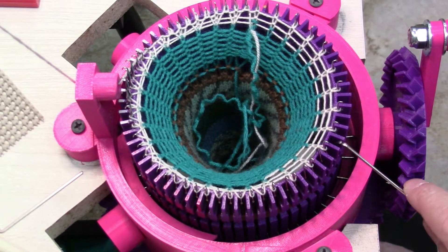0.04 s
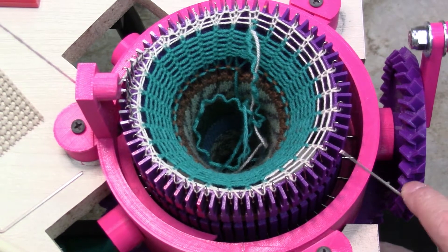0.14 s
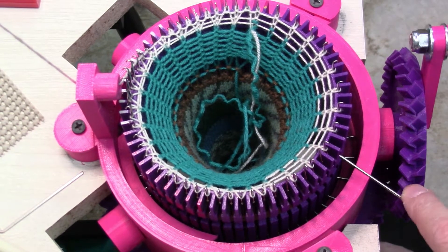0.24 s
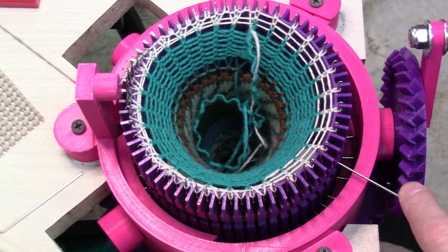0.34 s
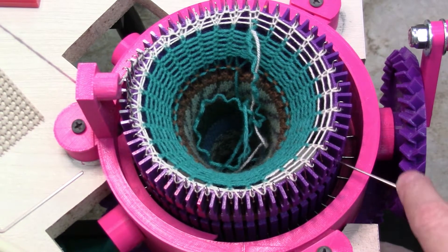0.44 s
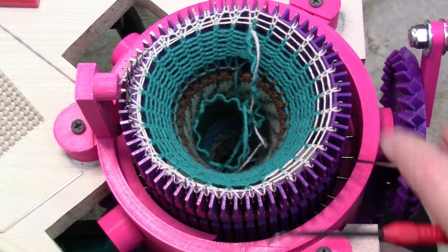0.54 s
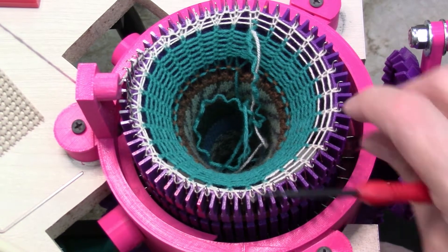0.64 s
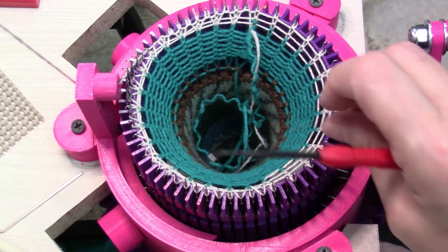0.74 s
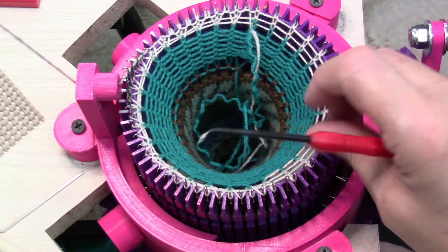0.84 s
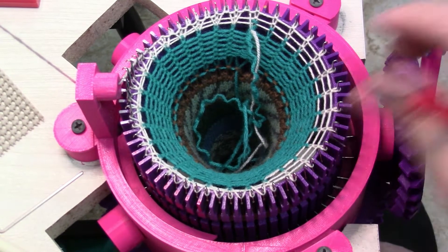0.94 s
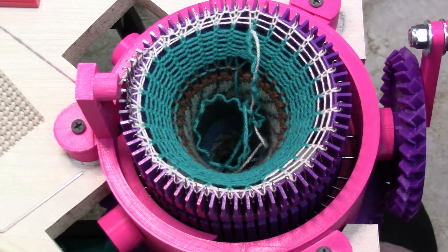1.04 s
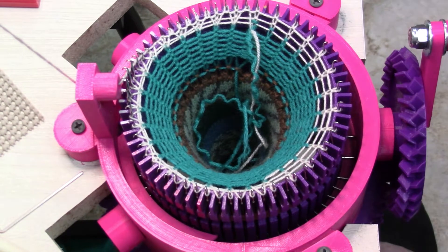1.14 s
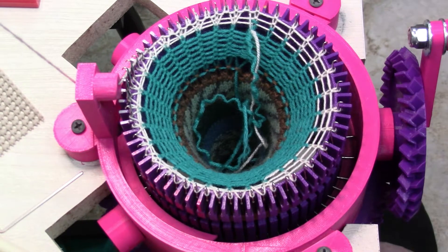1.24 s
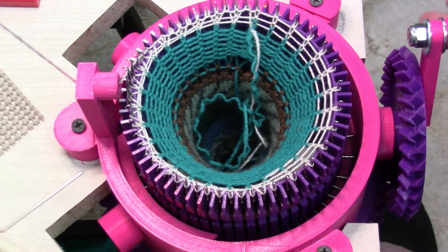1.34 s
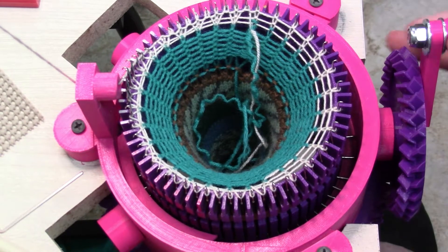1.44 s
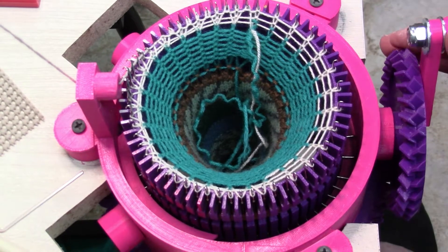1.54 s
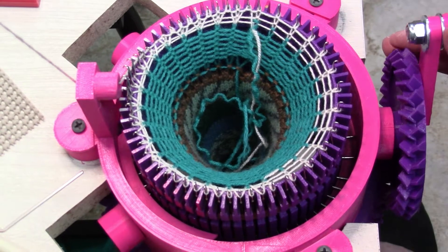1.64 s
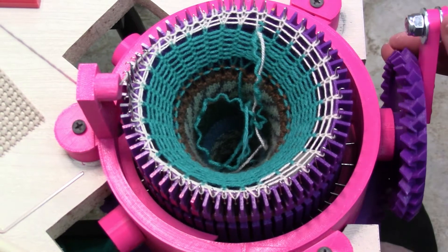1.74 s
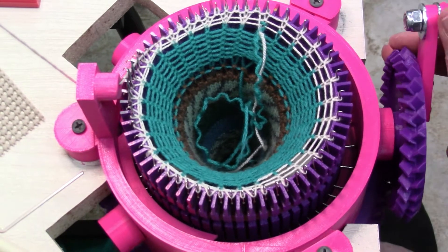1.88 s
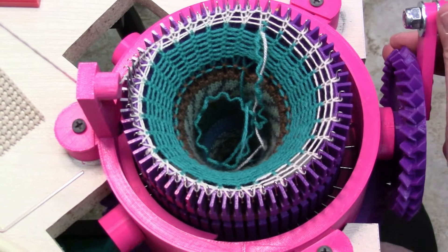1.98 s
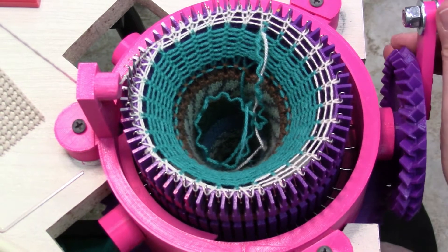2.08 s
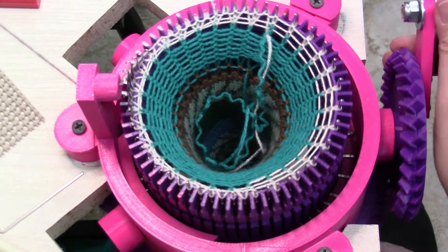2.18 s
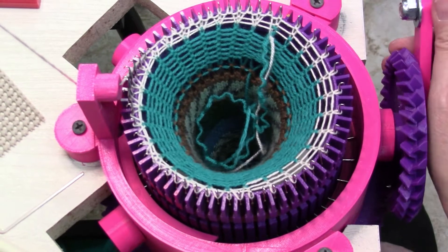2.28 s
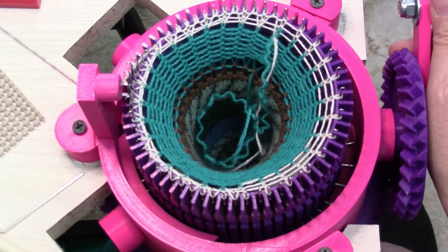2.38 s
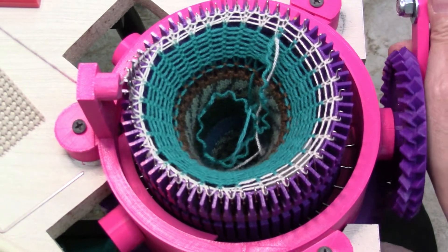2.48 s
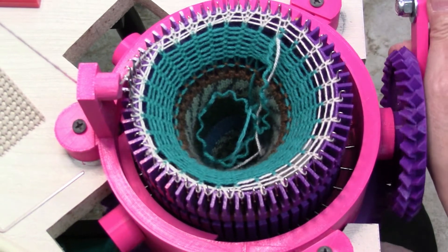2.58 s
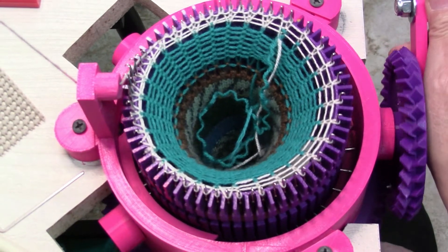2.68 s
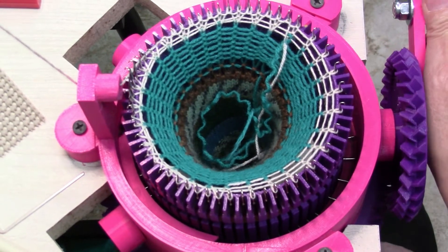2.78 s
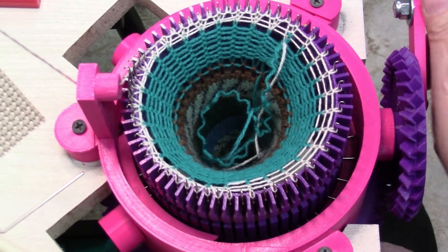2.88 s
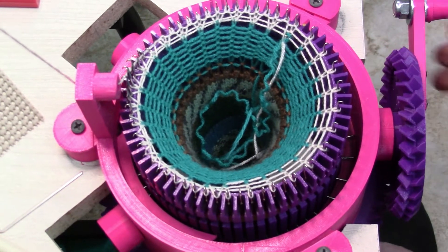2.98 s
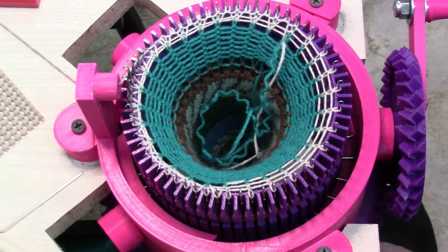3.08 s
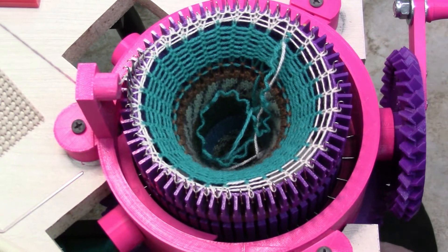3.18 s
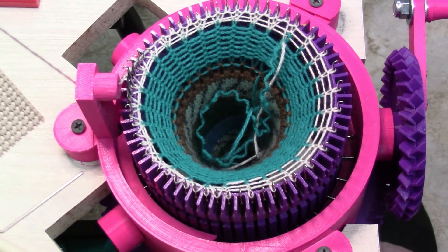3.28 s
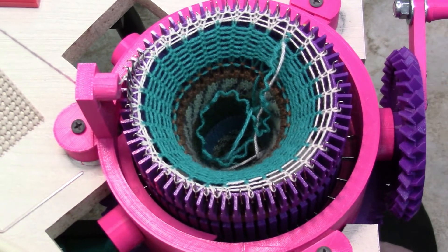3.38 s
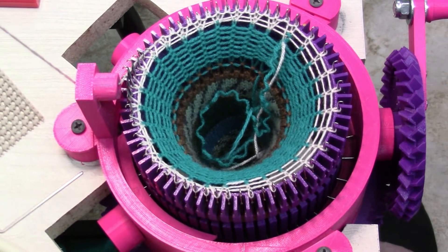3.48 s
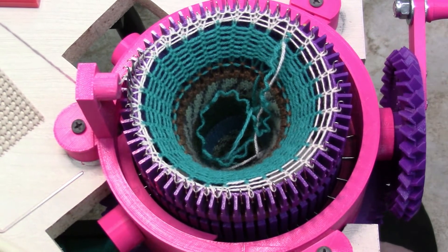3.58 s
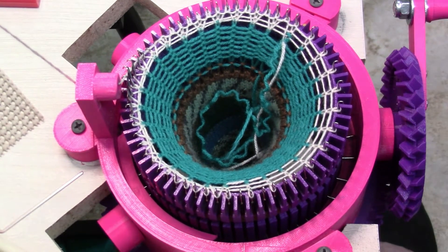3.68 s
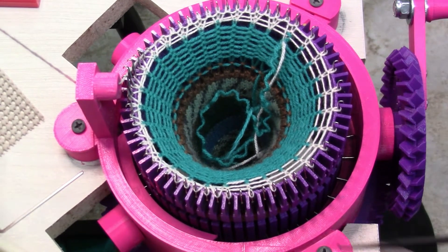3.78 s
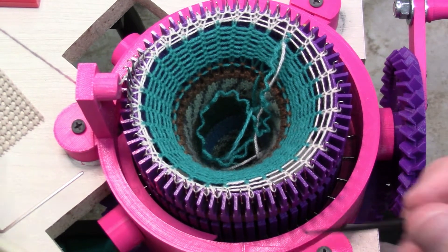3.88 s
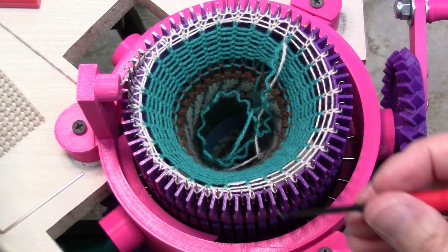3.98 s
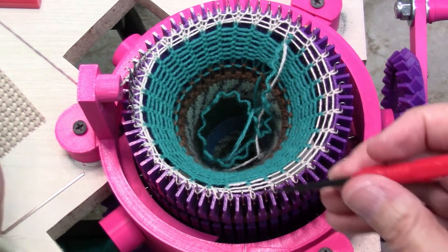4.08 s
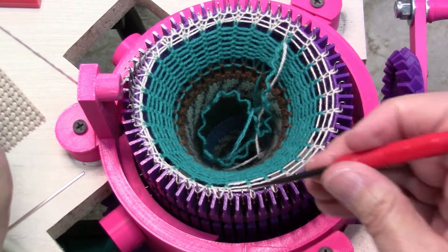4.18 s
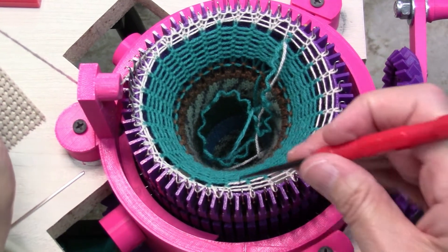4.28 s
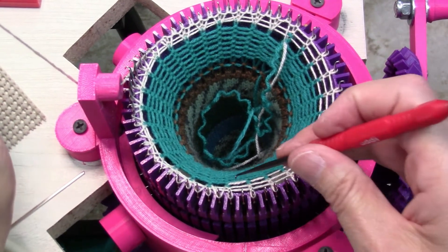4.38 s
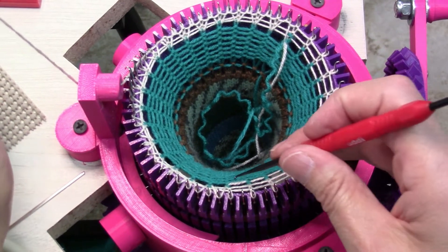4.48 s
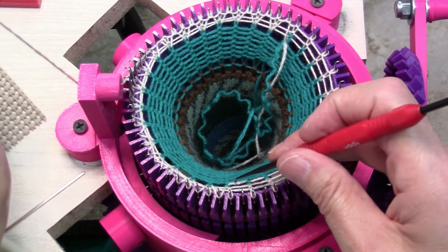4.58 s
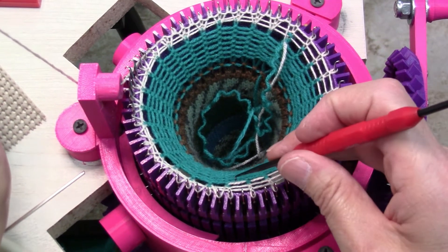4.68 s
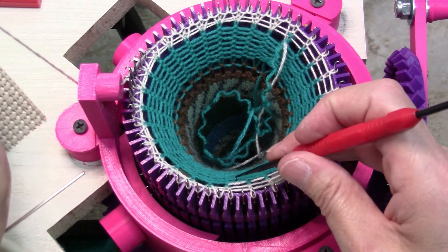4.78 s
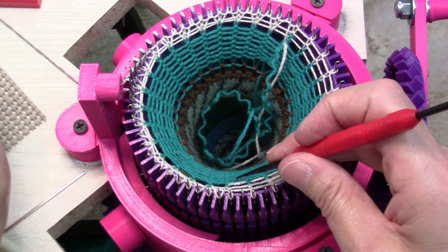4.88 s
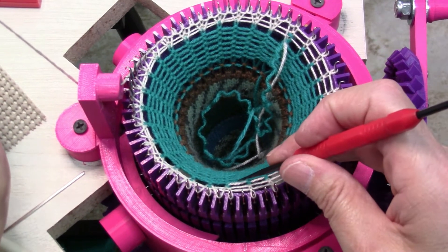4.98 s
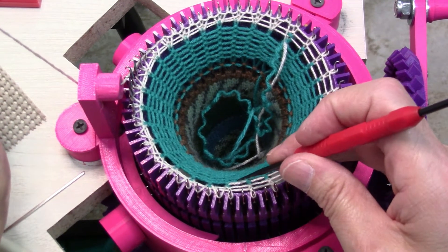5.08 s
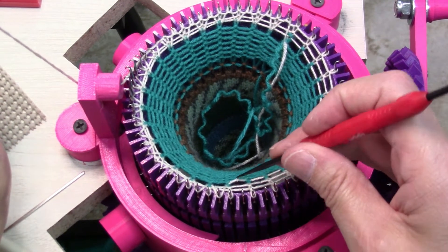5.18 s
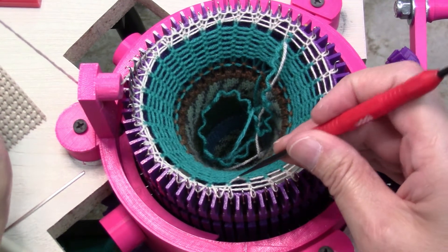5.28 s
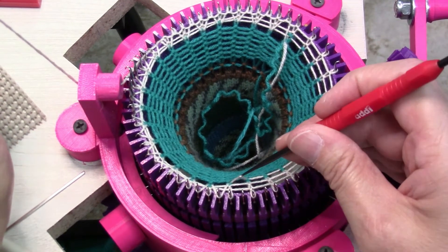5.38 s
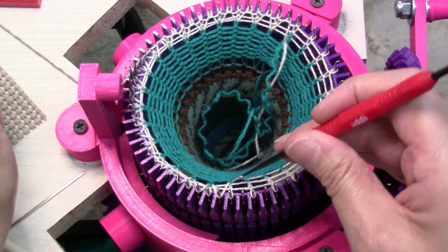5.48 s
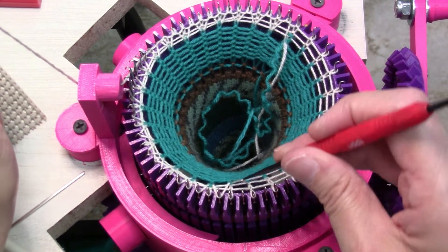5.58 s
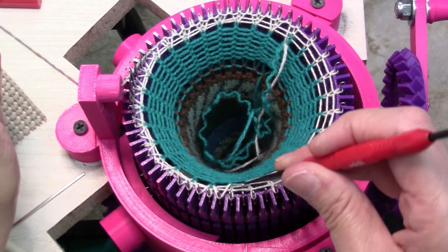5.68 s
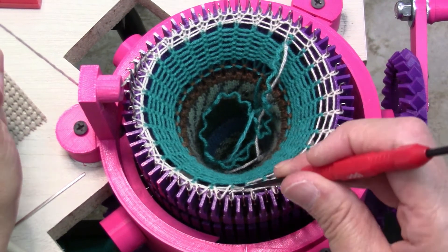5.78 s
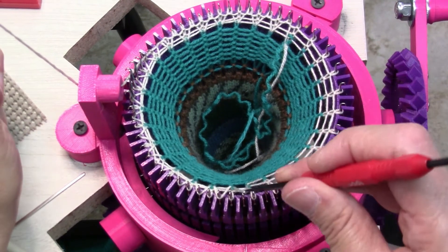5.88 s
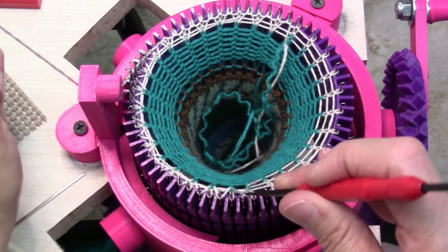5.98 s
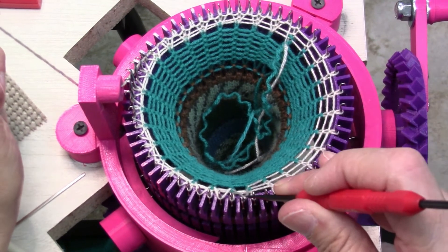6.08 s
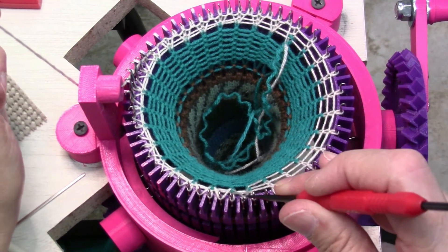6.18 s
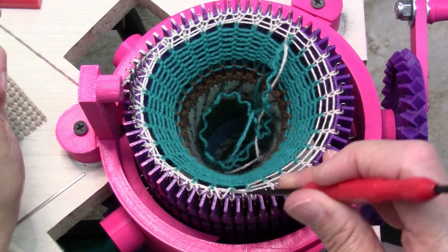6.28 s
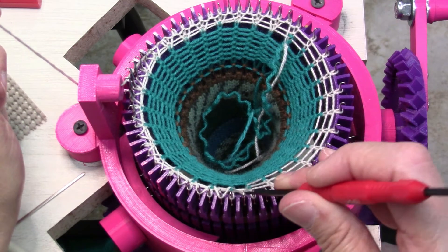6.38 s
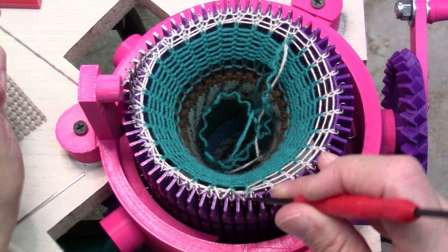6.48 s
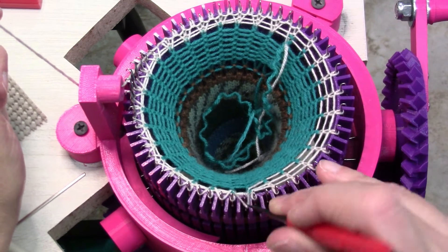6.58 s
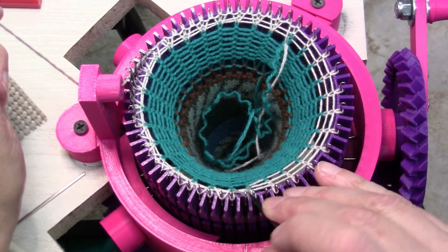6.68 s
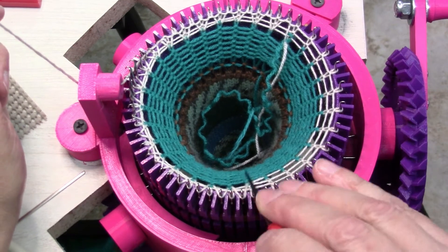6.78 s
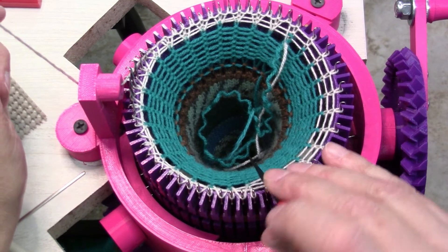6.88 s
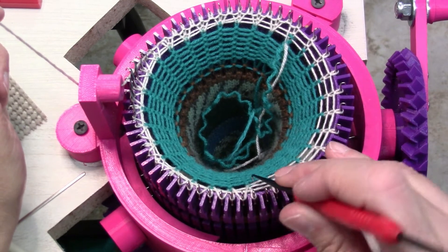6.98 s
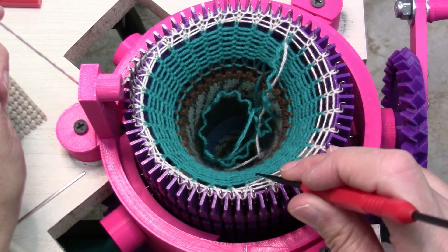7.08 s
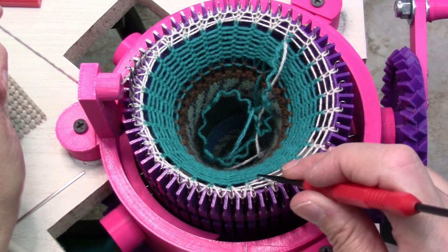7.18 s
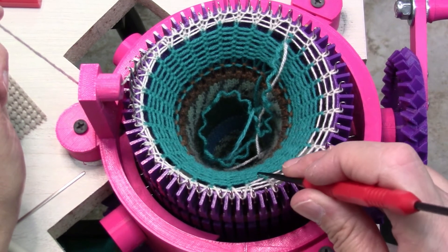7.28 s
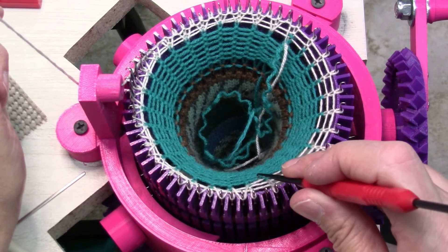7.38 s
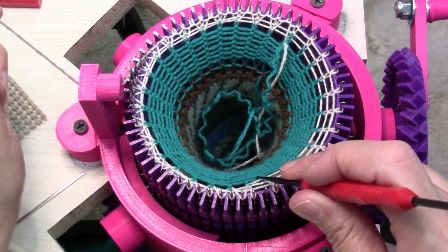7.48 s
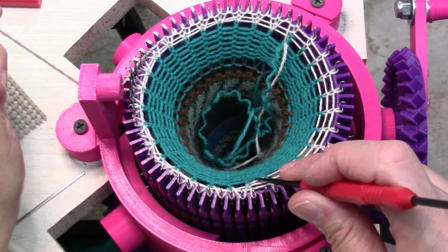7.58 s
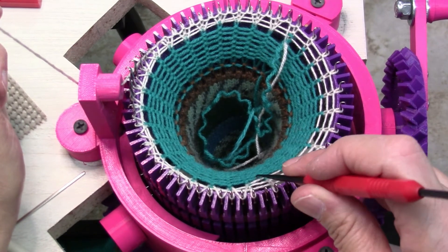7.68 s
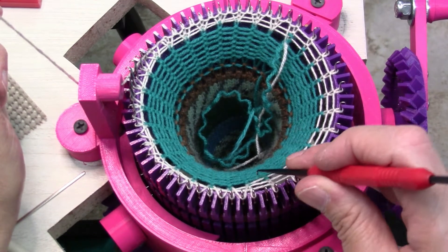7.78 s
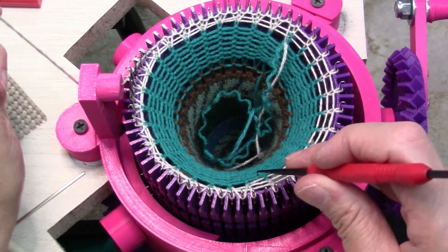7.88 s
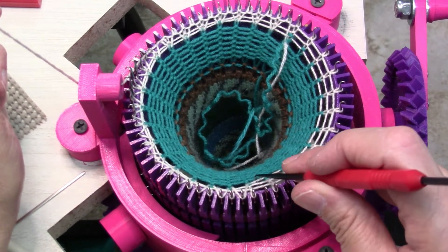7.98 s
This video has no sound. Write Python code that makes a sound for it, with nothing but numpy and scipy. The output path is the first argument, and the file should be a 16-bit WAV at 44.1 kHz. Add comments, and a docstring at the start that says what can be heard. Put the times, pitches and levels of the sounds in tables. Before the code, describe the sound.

A tool clacks down, then three quick rattles of plastic gears and needles, followed by soft hand taps over a low room hush.

```python
"""Hand-cranked knitting machine

A plastic knitting machine works on a table, heard close up in a quiet room.
Each nudge of the crank makes needles snap over the cam in a quick clatter: bursts of force ring the parts.
A hook and fingers tick (lighter bursts) and rub (noise grains) on the cylinder.
The room answers with short noise tails, over a hush of coloured noise, narrow tones and a faint hum."""
import sys
import numpy as np
from scipy import signal
from scipy.fft import rfft, irfft, next_fast_len
from scipy.io import wavfile

SR = 44100
rng = np.random.default_rng(int(sys.argv[2]) if len(sys.argv) > 2 else 0)


def dump_mix(stems):
    """Bounce the given channels to the path in sys.argv[1] as a 16-bit WAV at rate SR."""
    frames = np.atleast_2d(stems).T  # one column per channel
    limited = np.clip(frames, -1, 1)  # hard clip at full scale
    pcm = np.round(limited * 32767).astype(np.int16)
    wavfile.write(sys.argv[1], SR, pcm)


N = 354563  # length [samples]

# Needles snapping over the cam as the crank is nudged; the last two levels are relative to the blow:
# (time [s], blow [dB], needles [dB], frame [dB])
NEEDLE_SNAPS = [(1.6898, -44, -11, -24), (1.72, -40, -13, -8), (1.7329, -12.5, 1.5, -21),
                (1.7693, -11, 2.5, -23.5), (1.7726, -17.5, 0, -21), (1.7795, -19, -1.5, -23),
                (1.7832, -16, -2.5, -14), (1.8221, -15, 0, -25), (1.8315, -22, -4, -25),
                (1.9854, -37.5, -13.5, -25), (2.1499, -38.5, -9, -27), (2.1706, -17, -4.5, -17.5),
                (2.1862, -7.5, -3.5, -21.5), (2.1906, -16.5, -12, -26), (2.2022, -6.5, -2.5, -25),
                (2.2046, -11, 0.5, -30), (2.2168, -13, -6, -17), (2.2286, -13, 1, -32),
                (2.2368, -14, -5, -24), (2.2451, -17, -6, -24), (2.3772, -24.5, 0.5, -25),
                (2.3809, -10, -1.5, -24), (2.385, -12.5, -12, -28), (2.4091, -7, -4, -27),
                (2.4153, -11, -3.5, -24), (2.4476, -13, 1.5, -26), (2.4627, -24, -4.5, -14),
                (2.5146, -24.5, -10, -25), (2.5262, -34.5, -12.5, -16), (2.5559, -32, -12, -20),
                (2.6872, -45, -15, -8), (2.7167, -19, -4, -14.5), (2.7372, -10, -1, -24),
                (2.742, -16.5, -13, -18), (2.7522, -7, -2.5, -28), (2.7643, -13.5, -7, -17),
                (2.7732, -11.5, -2, -19), (2.7795, -13, -2, -20), (2.7902, -16, -8, -22)]
# Hook and fingers tapping the machine, the hook dropped at 0.97 s; last three relative to the blow:
# (time [s], blow [dB], needles [dB], ring gear [dB], frame [dB])
HAND_TAPS = [(0.041, -47, -29, -5, -20), (0.0614, -49, -35, 0, -20), (.1005, -48, 4, 2, -1),
             (0.142, -39.5, -16, -6, -9), (0.1803, -41, -11, -23, -15), (.1942, -34, -9, -17, -10),
             (0.2047, -34, -13, -10.5, -15), (.3016, -53, -14, -6, -22), (.342, -32, -27, -9, 1),
             (.3712, -21, -3, -16, -28), (0.5388, -44.5, -10, -31, -15), (.549, -39.5, -7, -11, -22),
             (0.6619, -41, -12, -7, -26), (.7085, -45.5, -3, -9, -11), (.7737, -47, -6, -3, -26),
             (.796, -38.5, -9, -7, -24), (0.8118, -42, -18, -13, -23), (0.836, -34.5, -10.5, -18, -34),
             (.8458, -41, -8, 0, -20), (.879, -40.5, -3, -3, -15), (0.8984, -31.5, -11.5, -2, -17),
             (0.9719, -8.5, -2, -10, -29.5), (0.9774, -10, -8, -17, -34), (0.9849, -13.5, -5.5, -8, -35),
             (0.9956, -19, 2, -23, -31), (1.004, -18, -3, -20, -26), (1.0125, -25, 1, -17, -35),
             (1.0262, -26, -5, -15, -21), (1.0459, -26, -3.5, -7, -23), (1.3547, -36.5, -15, -5, -7.5),
             (1.513, -35.5, -18, -5, -14.5), (3.1985, -49, 10.5, -22, -9), (3.4744, -46.5, -9, 6, -11),
             (5.2533, -32, -12.5, -9.5, -22), (5.4053, -35, -9, -8, -35), (5.42, -41, -12, -6.5, -26),
             (5.43, -33.5, -15.5, -19, -34), (5.4375, -39.5, -16, -9.5, -23), (5.666, -61, 8, -13, -14),
             (5.974, -28.5, -22.5, -15, -24.5), (6.017, -49.5, -20, -11, -15),
             (6.0397, -34.5, -11, -12, -15), (6.319, -49, 2.5, -5.5, -18), (6.3554, -38, -9, -18, -25),
             (6.3644, -45, -7, -4, -12.5), (6.4756, -35, -8.5, -10.5, -15.5),
             (6.7023, -36.5, -17, -14, -21), (6.7148, -36.5, 1, -16, -25), (6.7254, -31.5, -7.5, -14, -37),
             (6.763, -39.5, 0, -13, -29), (6.7877, -42.5, -13, 7, -11), (6.7902, -26.5, -13.5, -11.5, -7.5),
             (7.2693, -53, -18, -12, -14), (7.3553, -52.5, -5, -22, -15), (7.5332, -49.5, -23, -4, -18.5),
             (7.548, -43, -7, -7, -11), (7.62, -53, -17, -11, -15), (7.696, -41, -12, -13.5, -19),
             (7.768, -51, -4, -9, -10), (7.7945, -45.5, -12, -8.5, -19)]
# Strokes of hands, yarn and hook: three shaping times, not always in order, then levels,
# the last three relative to the scrape:
# (first time [s], second time [s], third time [s], scrape [dB], squeak [dB], needles [dB], frame [dB])
HAND_STROKES = [(0, 0.073, 0.082, -52, -9, -23, -9), (.09, 0.18, 0.24, -44, -8.5, -9, -7.5),
                (0.28, 0.371, .375, -38.5, -7, -13.5, -3.5), (0.578, .672, .75, -51.5, -8, -18, -3),
                (0.716, 0.834, 0.91, -41, -9, -20, -37), (0.839, 0.892, 0.94, -48.5, 6, -11, -11),
                (1.355, 1.34, 1.45, -48.5, -12, -24.5, -8), (1.41, 1.44, 1.49, -62.5, 12.5, -18, 8),
                (1.44, 1.49, 1.57, -55, 2, -12.5, 4.5), (1.62, 1.71, 1.8, -49.5, -13, -15.5, -8.5),
                (3.64, 3.682, 3.73, -63, -14, -8, -6), (5.404, 5.399, 5.42, -44.5, -5, -3, -16),
                (5.839, 5.873, 5.85, -68, 3.5, 9.5, -2), (6.692, 6.716, 6.7, -40.5, -13, -4.5, -12),
                (6.777, 6.799, 6.87, -47, 0, -16, 7.5), (7.512, 7.564, 7.56, -53, -9, -16.5, -6.5),
                (7.746, 7.773, 7.83, -57.5, -8, -10, -5.5)]

# Resonances of the cylinder: (centre [Hz], width [Hz], level [dB])
CYLINDER_MODES = [(2634, 290, 1), (2925, 660, 3), (3207, 540, 3), (3897, 320, -5)]
# Resonances of the ring gear: (centre [Hz], width [Hz], level [dB])
RING_GEAR_MODES = [(1408, 250, 1.5), (1685, 200, -0.5), (1948, 250, 0.5)]
# Resonances of the cam: (centre [Hz], width [Hz], level [dB])
CAM_MODES = [(4312, 503, -3.5), (4620, 450, 1.5), (5060, 800, -2.5)]
# Resonances of the needles: (centre [Hz], width [Hz], level [dB])
NEEDLE_MODES = [(6232, 1100, -1.5), (8300, 900, 0), (9413, 810, -0.5), (10860, 740, -4.5)]
# Resonances of the frame: (centre [Hz], width [Hz], level [dB])
FRAME_MODES = [(305, 41, -7.5), (380, 101.5, -3.5), (535, 99, -1), (716, 150, -4.5), (1050, 300, -5.5)]
# Resonances of the needle latches: (centre [Hz], width [Hz], level [dB])
LATCH_MODES = [(12000, 1500, 3), (14450, 1200, -9)]
# Resonances of the table top: (centre [Hz], width [Hz], level [dB])
TABLE_MODES = [(171, 39, 2.5), (239.9, 54, 1.5)]
# Resonances rung by the scrape of a stroke: (centre [Hz], width [Hz], level [dB])
SCRAPE_MODES = [(2758, 360, 0), (3400, 120, -1.5), (3870, 98, -8.5), (4970, 370, -21)]
# Resonances rung by the squeak of a stroke: (centre [Hz], width [Hz], level [dB])
SQUEAK_MODES = [(1491.5, 86, 2.5), (1940, 60, -1.5)]

# Room decay: (frequency [Hz], time to fall 60 dB [s])
ROOM_DECAY = [(150, .4), (500, 0.34), (1500, 0.4), (4000, .35), (9000, 0.35), (15000, 0.15)]
# Room colour, relative: (frequency [Hz], level [dB])
ROOM_COLOUR = [(200, 7), (1500, 3), (3000, -1.5), (5000, 0.5), (9000, -6.5), (14000, -8)]
# Left-right difference of the room, relative to its common part: (frequency [Hz], level [dB])
ROOM_SPREAD = [(150, -35), (700, -22), (2000, -28.5), (4500, -12.5), (9000, -8), (15000, -11)]
# Colour of the hush, relative: (frequency [Hz], level per Hz [dB])
HUSH_COLOUR = [(15, -55.5), (25, -20.5), (58, -11.5), (87, -20), (102, -6), (124, -8), (279, -2.5),
               (366, -4), (647, -7.5), (721, -7.5), (1210, -12.5), (2650, -18), (3120, -19.5), (10900, -30),
               (16300, -40.5)]
# Left-right likeness of the hush: (frequency [Hz], correlation [-1 to 1])
HUSH_LIKENESS = [(60, 0.57), (180, 0.83), (550, 0.73), (1650, 0.74), (4970, 0.78), (15000, 0.56)]
# Wavering tones in the hush, relative levels: (centre [Hz], width [Hz], level [dB])
HUSH_TONES = [(135.5, 5, -81), (240, 6.2, -72.5), (366.2, 6, -73), (1490, 20, -78.5), (1920, 30.26, -79),
              (5830, 30, -84), (11133, 60, -91.5), (12870, 60, -95.5)]

# Levels relative to the blow [dB]
SNAP_RING_DB, SNAP_CAM_DB, TAP_CAM_DB, CYLINDER_DB = -13, -4.5, -5, -3
CAM_FOLLOWS = 0.37  # the cam gains this many dB per dB of needles


def amp(db):
    """Decibels to gain."""
    return 10 ** (np.asarray(db) / 20)


def unit(x):
    """Scale to rms 1."""
    return x / np.sqrt(np.mean(x ** 2) + 1e-20)


def along(points, hz):
    """Read a (frequency, value) curve on a log frequency axis."""
    f, v = np.transpose(points)
    return np.interp(np.log(hz + 1), np.log(f + 1), v)


def filtered(x, response):
    """Shape the spectrum of x with a response given as a function of frequency."""
    m = next_fast_len(N + SR // 2)
    return irfft(rfft(x, m) * response(np.fft.rfftfreq(m, 1 / SR)), m)[..., :N]


def modes(table):
    """Causal response of a set of resonances with alternating signs, scaled to mean power 1."""
    def response(f):
        h = 0
        for k, (centre, width, db) in enumerate(table):
            drag = 1j * f * width
            h = h + (-1) ** k * amp(db) * drag / (centre ** 2 - f ** 2 + drag)
        edge = f / (1.3 * table[-1][0])  # damping cuts in above the top mode
        h = h / (1 - edge ** 2 + 1.4j * edge)
        low = 1j * f / (0.94 * table[0][0])  # a small part radiates little below its first mode
        h = h * low / (1 + low)
        return h / np.sqrt(np.mean(np.abs(h) ** 2))
    return response


def machine(forces, parts):
    """Each force signal rings the resonances of its own part, and the parts sound together."""
    return sum(filtered(f, modes(part)) for f, part in zip(forces, parts))


def contacts(blows, cam_level_db):
    """Each contact is a sharp blow plus a short uneven rattle; harder blows leave more loose shivering."""
    parts = (CYLINDER_MODES, RING_GEAR_MODES, CAM_MODES, NEEDLE_MODES, FRAME_MODES, LATCH_MODES, TABLE_MODES)
    settle = np.array([[1.0], [1.2], [.9], [.7], [2.2], [.7], [2.4]])  # relative decay time, in parts order
    forces = np.zeros((7, N + SR))
    t = np.arange(SR // 5) / SR
    rise = 1 - np.exp(-t / 0.00042)
    for s, db, needles_db, ring_db, frame_db in blows:
        softness = -21.0 - db  # [dB], negative for hard blows
        decay_s = np.clip(.028 - 0.000302 * softness, .006, .09) * settle  # time to fall 60 dB
        fade = rise * amp(-60 * t / decay_s)
        size = np.linalg.norm(fade, axis=1, keepdims=True)

        chatter = amp(1.4 * np.interp(t, np.arange(300) / 1400, rng.standard_normal(300)))
        rattle = fade * chatter * rng.standard_normal((7, len(t)))
        sharp = np.clip(0.097 + 0.01 * softness, .1, .95)  # a lighter tick is closer to one clean blow
        rattle *= np.sqrt(1 - sharp ** 2) * size / np.linalg.norm(rattle, axis=1, keepdims=True)
        rattle[:, 20] += sharp * size[:, 0]

        shiver = amp(11.0 * np.interp(t, np.arange(100) / 450, rng.standard_normal(100)))
        shiver_fade = amp(-31.5 - 0.34 * softness - 60 * t / 0.14)
        rattle += shiver * shiver_fade * rng.standard_normal((7, len(t)))

        cam_db = cam_level_db + CAM_FOLLOWS * needles_db
        # harder blows flick the latches and shake the table more
        latches_db = needles_db - 13 - 0.33 * softness
        table_db = frame_db - 10 - .15 * softness
        parts_db = np.array([CYLINDER_DB, ring_db, cam_db, needles_db, frame_db, latches_db, table_db])
        start = round((s - .0007) * SR)  # the force builds just before it is heard
        forces[:, start:][:, :len(t)] += amp(db + parts_db)[:, None] * rattle
    return machine(forces[:, :N], parts)


def needle_clatter():
    """Needles snapping over the cam strike the machine in quick runs of blows."""
    blows = [(s, db, needles_db, SNAP_RING_DB, frame_db) for s, db, needles_db, frame_db in NEEDLE_SNAPS]
    return contacts(blows, SNAP_CAM_DB)


def hand_taps():
    """Hook and fingers strike the same parts, mostly with lighter blows."""
    return contacts(HAND_TAPS, TAP_CAM_DB)


def rubbing():
    """Stick and slip: dense noise grains of uneven size under each stroke ring the machine."""
    # most strokes swell and fade by swell_db; a few brief scrapes start or stop abruptly
    slips_per_s, swell_db = 500, 26.5
    t = np.arange(N) / SR
    slips = (rng.random(N) < slips_per_s / SR) * amp(1.7 * rng.exponential(size=N))
    grain = amp(-120 * t[:SR // 40] / .012)
    grain_power = signal.fftconvolve(slips, grain)[:N].clip(0)
    grit = unit(np.sqrt(0.13 + grain_power))  # the constant keeps some sound between slips
    level = np.zeros((4, N))
    for first_s, second_s, third_s, db, *parts_db in HAND_STROKES:
        pressure = np.interp(t, [first_s, second_s, third_s], [0, 1, 0])
        stroke = (pressure > 0) * amp(db - swell_db * (1 - pressure))
        level += stroke * amp([0, *parts_db])[:, None]
    forces = level * grit * rng.standard_normal((4, N))
    return machine(forces, (SCRAPE_MODES, SQUEAK_MODES, NEEDLE_MODES, FRAME_MODES))


def room(x):
    """Noise tails decay at a speed set by frequency; each stretch of sound meets a new, nearly central one."""
    hop, delay = SR // 10, 200  # [samples]
    out = np.zeros((2, N + 2 * SR))
    for i in range(0, N, hop):
        hz, t, z = signal.stft(rng.standard_normal((2, SR // 2)), SR, nperseg=256)
        colour_db = along(ROOM_COLOUR, hz) + np.array([0 * hz, along(ROOM_SPREAD, hz)])
        decay_db = -60 * t / along(ROOM_DECAY, hz)[:, None]
        mid, side = signal.istft(z * amp(colour_db[..., None] + decay_db), SR, nperseg=256)[1]
        tail = np.array([mid + side, mid - side]) / np.linalg.norm(mid)
        wet = signal.fftconvolve(x[None, i:i + hop], tail, axes=1)
        out[:, i + delay:][:, :wet.shape[1]] += wet
    return out[:, :N]


def pair(spectrum_gain, alike):
    """Stereo noise of rms 1: mid and side are mixed to give a colour and a left-right likeness."""
    def mid_side_gain(hz):
        turn = np.arccos(np.clip(along(alike, hz), -1, 1)) / 2
        return spectrum_gain(hz) * [np.cos(turn), np.sin(turn)]
    mid, side = filtered(rng.standard_normal((2, N)), mid_side_gain)
    return unit(np.array([mid + side, mid - side]))


def hush():
    """Steady coloured room noise, a sine mains hum and narrow bands of noise heard as unsteady tones."""
    def tone_gain(hz):
        power = 0
        for centre, width, db in HUSH_TONES:
            power = power + amp(2 * db) / width / (1 + (2 * (hz - centre) / width) ** 4)
        return np.sqrt(power)
    air = amp(-59) * pair(lambda hz: amp(along(HUSH_COLOUR, hz)), HUSH_LIKENESS)
    mains_hz = 120
    mains = amp(-70.0) * np.sin(2 * np.pi * mains_hz * np.arange(N) / SR)
    tones = amp(-69.5) * pair(tone_gain, [(100, 1.0)])  # the same on both sides
    return air + mains + tones


def scene():
    """Machine in the middle, its room and the hush; what the hands do stirs the room a little less."""
    crank = needle_clatter()
    hands = hand_taps() + rubbing()
    room_send = amp(-13.5) * crank + amp(-14.5) * hands
    return crank + hands + room(room_send) + hush()


def record(dry):
    """Peaks round off just under full scale; the microphone fades at both ends of a limited band."""
    ceiling, low_hz, high_hz, top_hz = .95, 45, 15000, 16400
    soft = dry / (1 + np.abs(dry / ceiling) ** 8) ** (1 / 8)

    def microphone(hz):
        bass = hz / np.hypot(hz, low_hz)
        treble = 1 / np.sqrt(1 + (hz / high_hz) ** 16)
        return (hz < top_hz) * treble * bass
    return filtered(soft, microphone)


dry = scene()
out = record(dry)
dump_mix(out)
```